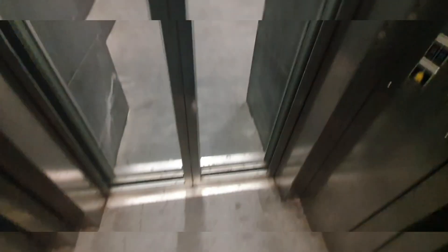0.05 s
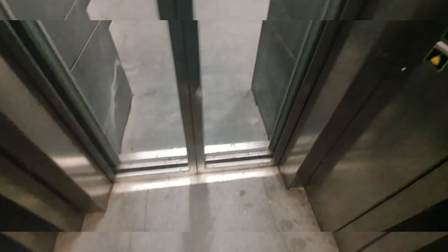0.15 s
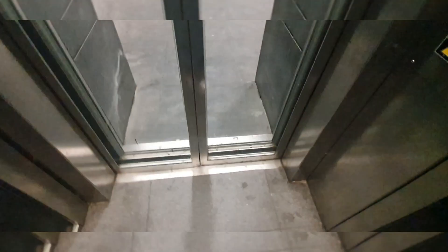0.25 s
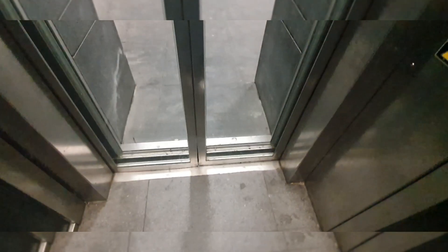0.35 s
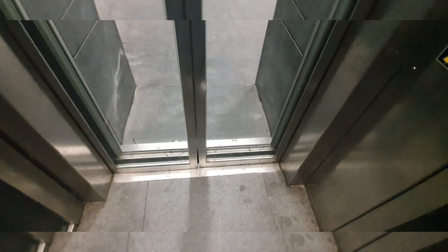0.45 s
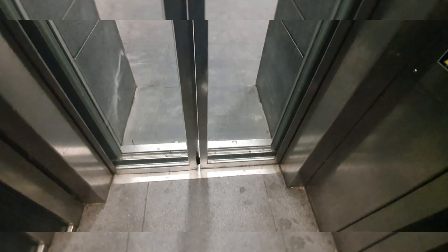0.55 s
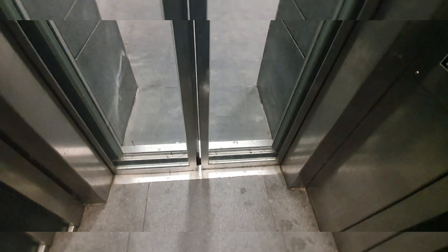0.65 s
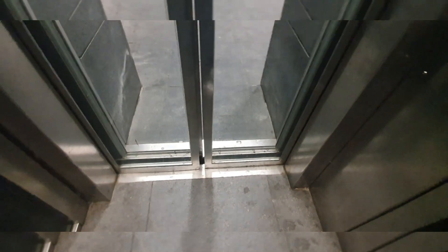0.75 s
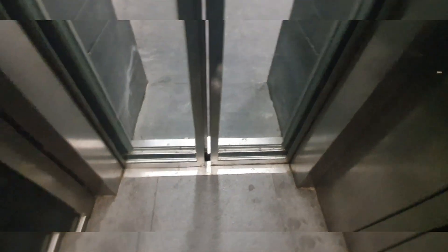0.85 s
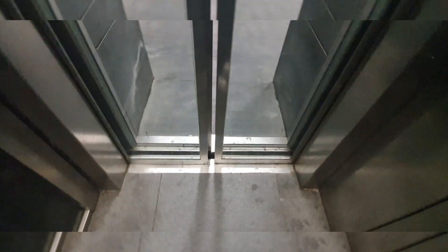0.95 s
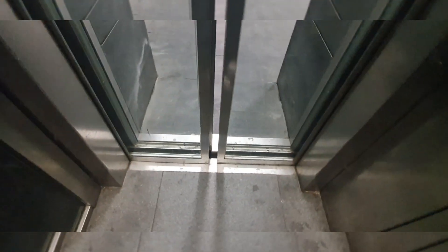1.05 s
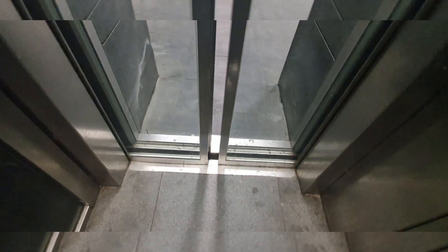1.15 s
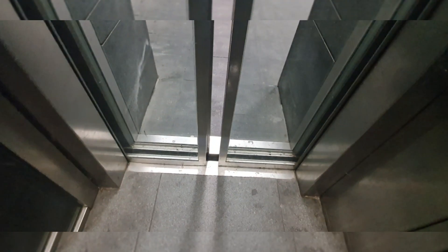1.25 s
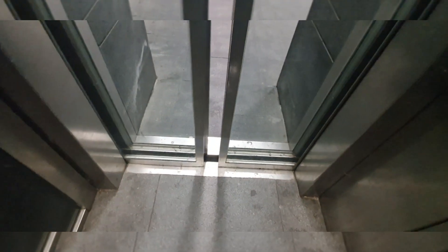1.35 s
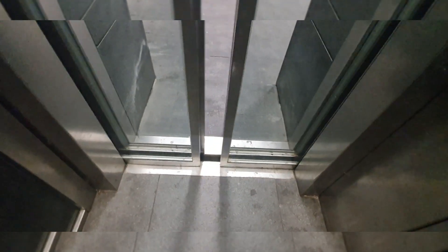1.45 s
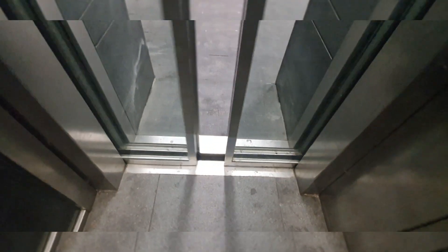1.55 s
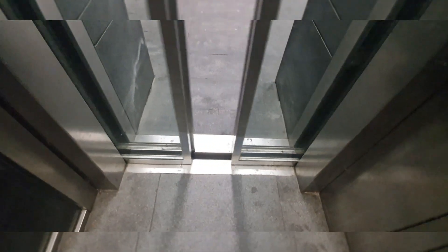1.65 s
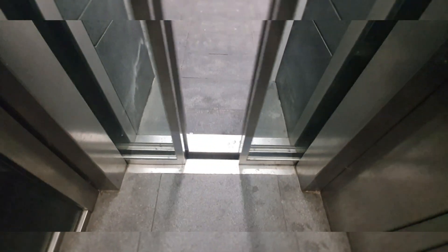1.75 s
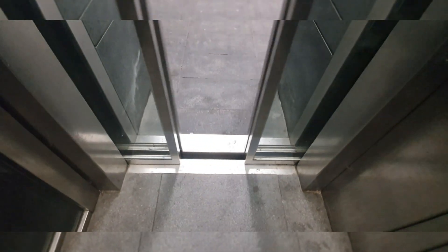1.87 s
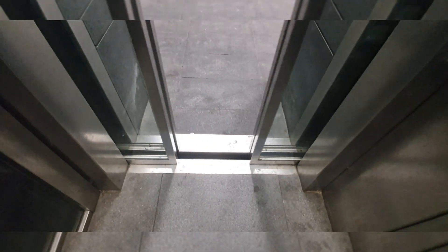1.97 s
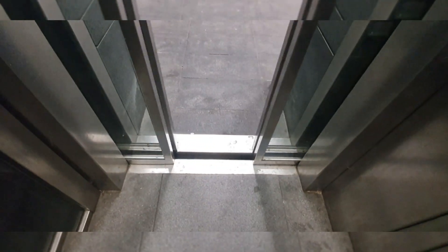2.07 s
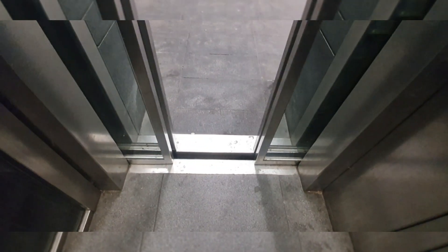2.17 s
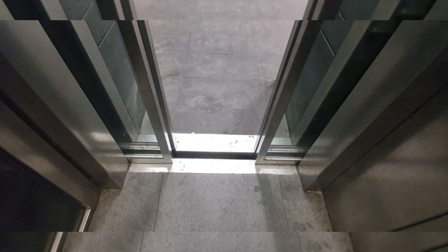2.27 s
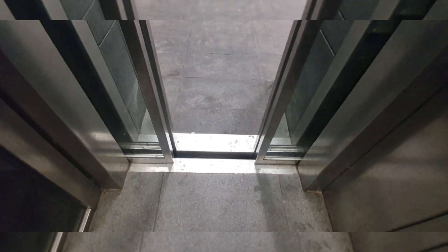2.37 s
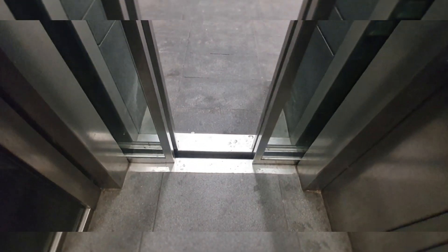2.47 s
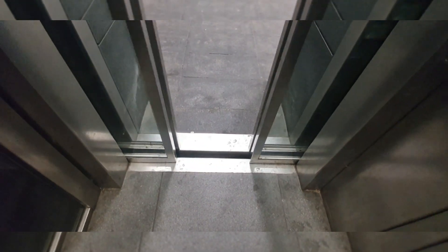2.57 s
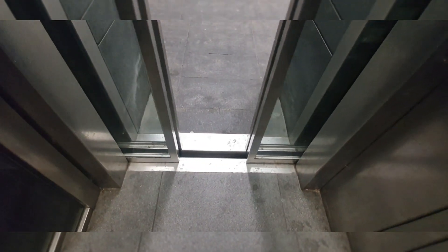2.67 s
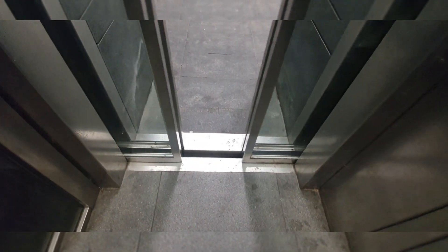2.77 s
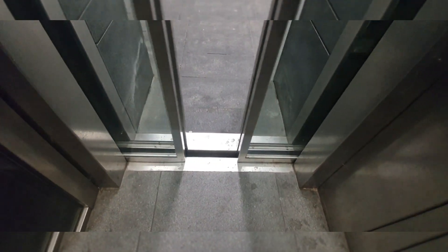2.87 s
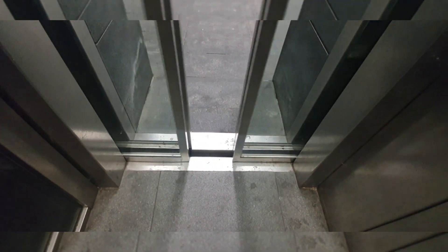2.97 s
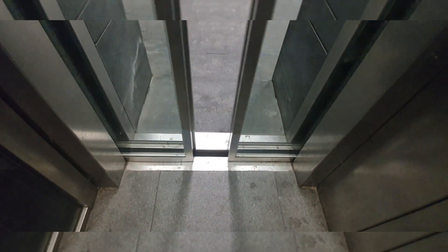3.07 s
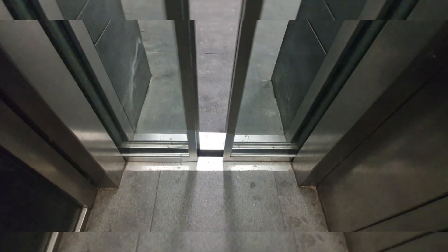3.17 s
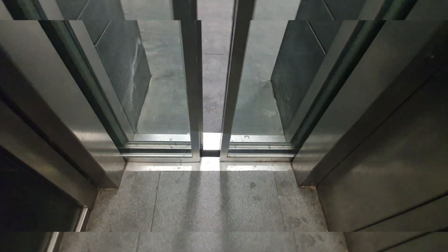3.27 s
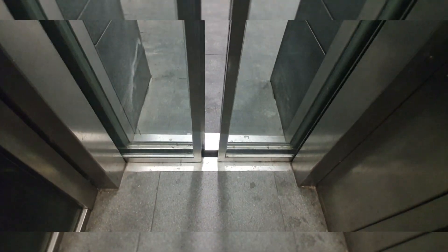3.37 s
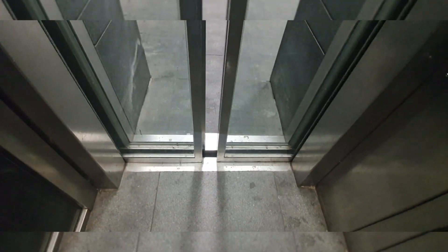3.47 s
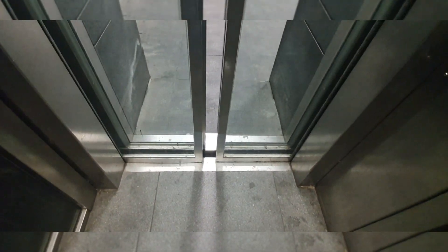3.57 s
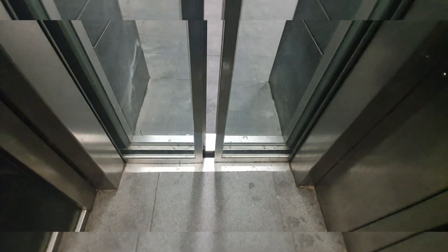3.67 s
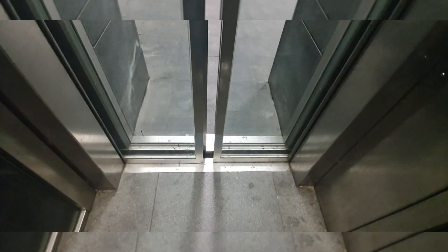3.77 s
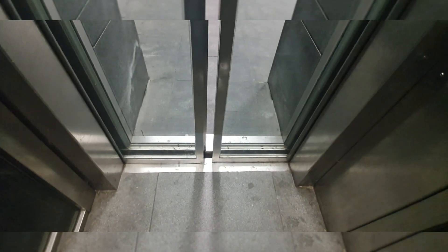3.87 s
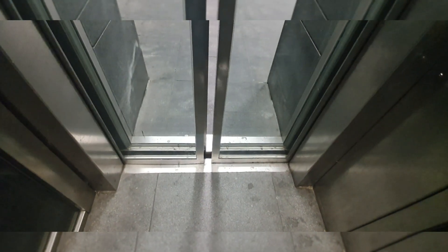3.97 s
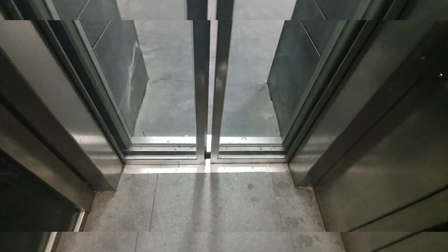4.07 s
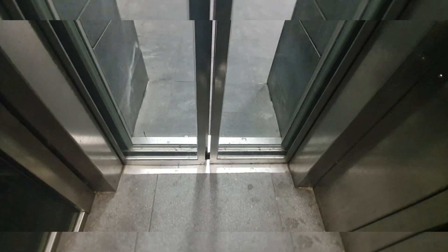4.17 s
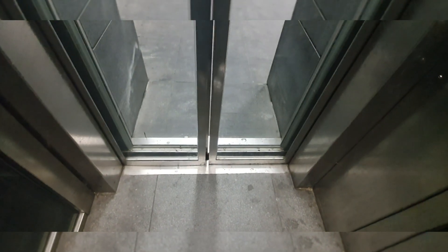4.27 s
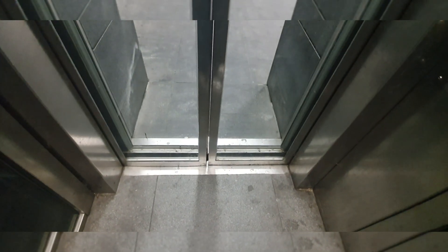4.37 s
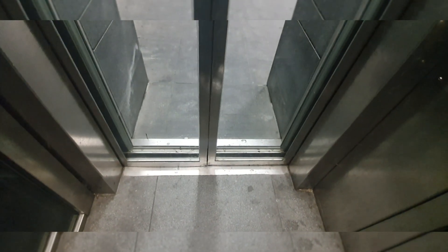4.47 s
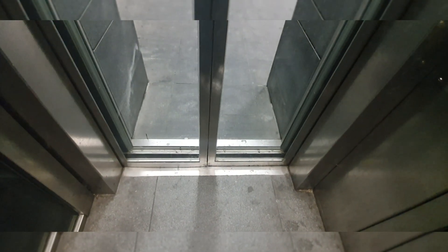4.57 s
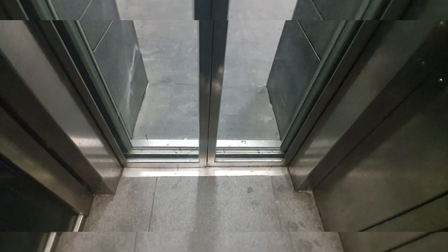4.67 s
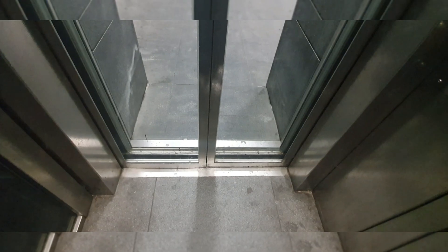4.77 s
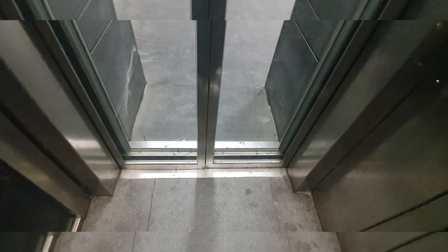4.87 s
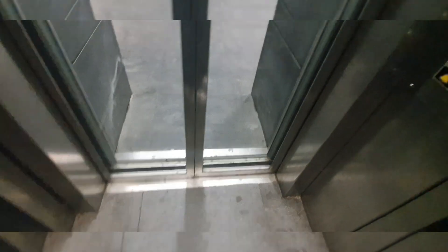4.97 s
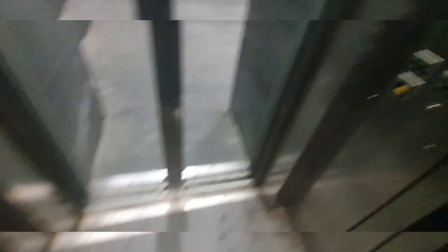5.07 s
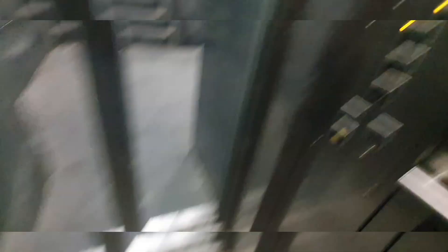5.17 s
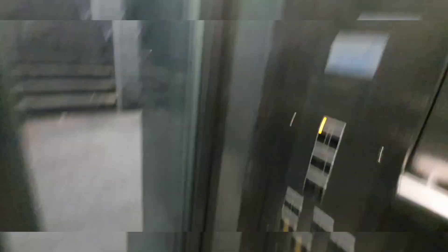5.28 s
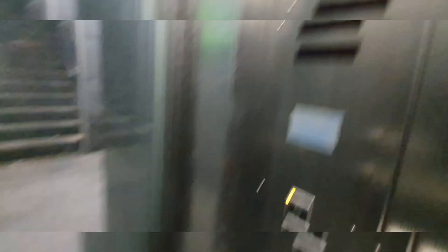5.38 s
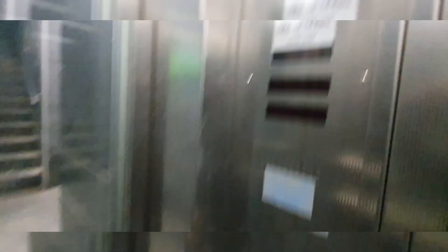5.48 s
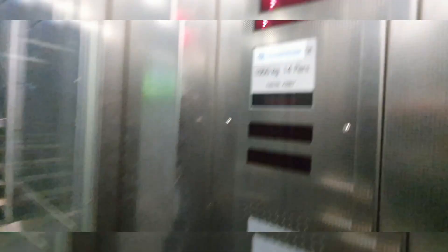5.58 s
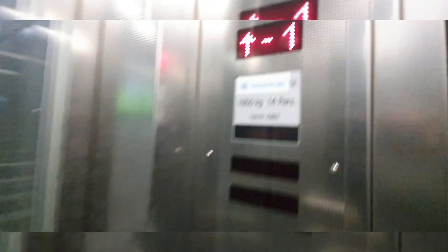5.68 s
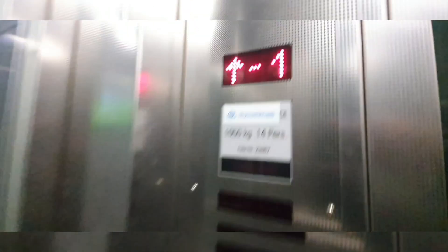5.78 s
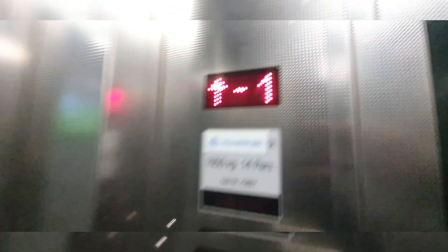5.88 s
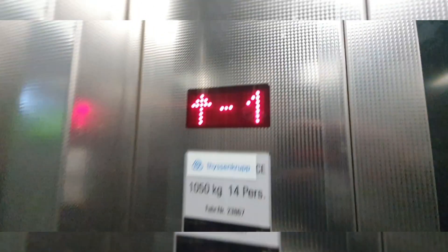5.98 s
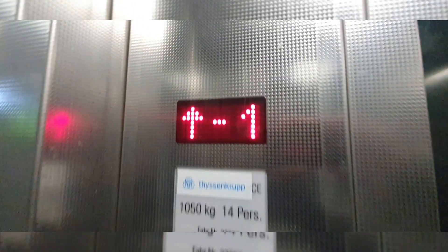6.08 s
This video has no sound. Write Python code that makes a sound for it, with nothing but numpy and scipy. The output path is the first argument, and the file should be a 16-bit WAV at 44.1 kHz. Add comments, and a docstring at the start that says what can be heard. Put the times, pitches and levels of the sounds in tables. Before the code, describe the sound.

Inside a steel lift, sliding doors clunk, rumble apart and return, meeting in a loud metallic clank with a short rubbery groan.

```python
"""A soft low jolt and a brief rustle open the ride in a steel lift car, under a faint whistle of wavering level.
Its glass doors then unlatch, roll apart, stop, roll back and meet with a clank; low throbs and rustling end it.
Rolling, jolts and knocks excite resonant panel modes; rubbing and contacts are shaped third-octave noise,
whose knocks die away in the concrete shaft. Struck steel and glass are sums of decaying sines;
the seal's groan, the hangers' squeak and the hums are gliding sines."""
import sys
import numpy as np
from scipy import signal
from scipy.io import wavfile

SR = 44100
rng = np.random.default_rng(int(sys.argv[2]) if len(sys.argv) > 2 else 0)


def log_audio(samples):
    """Write samples as a 16-bit WAV file to the path given in sys.argv[1]."""
    # one column per channel
    frames = np.atleast_2d(samples).T
    # limit to full scale, then quantise
    limited = np.clip(frames, -1, 1)
    pcm = np.round(limited * 32767).astype(np.int16)
    wavfile.write(sys.argv[1], SR, pcm)


N = 270333   # samples
LEFT_RIGHT = np.array([[1], [-1]])   # signs of the two channels
STEP = 16   # samples between envelope points


def from_db(db):
    """Logarithmic level: decibels to amplitude gain."""
    return 10 ** (np.asarray(db) / 20)


def rms_one(x):
    """Normalisation: a signal scaled to rms 1."""
    return x / np.sqrt(np.mean(x ** 2) + 1e-20)


def in_time(rows):
    """Linear interpolation: each column of a time curve, sample by sample."""
    s, *columns = np.transpose(rows)
    return [np.interp(np.arange(N) / SR, s, column) for column in columns]


def at_hz(points, hz):
    """Logarithmic pitch axis: a spectrum interpolated at a frequency."""
    table_hz, values = np.transpose(points)
    return np.interp(np.log(hz), np.log(table_hz), values)


def drift(rate_hz):
    """Low-passed noise: a slow random course of spread 1."""
    # two equal poles, run at every 40th sample; the settling part is dropped
    pole = np.exp(-80 * np.pi * rate_hz / SR)
    noise = rng.standard_normal(N // 40 + 2002)
    slow = signal.lfilter([1], [1, -2 * pole, pole * pole], noise)[2000:]
    return np.interp(np.arange(N) / 40, np.arange(len(slow)), rms_one(slow))


def ring(drive, hz, t60):
    """Two-pole resonance: a unit click sets a decaying sine of height 1 ringing."""
    radius = from_db(-60 / (t60 * SR))
    w = 2 * np.pi * hz / SR
    feedback = [1, -2 * radius * np.cos(w), radius * radius]
    return signal.lfilter([0, np.sin(w)], feedback, drive + 1e-18)


def after(s):
    """Event time base: the first sample and the time since, for up to one second."""
    i = round(s * SR)
    return i, np.arange(min(N - i, SR)) / SR


def swell(t, s, hold, rise_db_per_s, fall_db_per_s):
    """Exponential growth and decay: dB below the top of an event that rises, holds and falls."""
    return -rise_db_per_s * np.maximum(s - t, 0) - fall_db_per_s * np.maximum(t - s - hold, 0)


def add_db(a_db, b_db):
    """Incoherent addition: powers of unrelated sounds sum; b holds one row per sound."""
    return 10 * np.log10(from_db(2 * a_db) + from_db(2 * b_db).sum(axis=0))


# Likeness of the channels: (frequency [Hz], share alike [0 to 1])
LIKENESS = [(60, 1), (150, 0.87), (380, 0.83), (950, 0.026), (2400, .01), (6000, 0.45), (15000, .2)]
# Balance of the channels: (frequency [Hz], left minus right [dB])
LEAN = [(60, -1.5), (130, -2.5), (290, -3.5), (640, -2), (1410, -1.5), (3100, -4), (6820, 4),
        (15000, -21.5)]


def lean_gain(hz):
    """Interchannel level difference: the gain of each channel at a frequency."""
    return from_db(at_hz(LEAN, hz) / 2 * LEFT_RIGHT)


def stereo(mid, side, hz):
    """Interchannel coherence: two ports hear a band partly alike and lean to one side."""
    alike = np.clip(at_hz(LIKENESS, hz), 0, 1)
    both = np.sqrt((1 + alike) / 2) * mid + np.sqrt((1 - alike) / 2) * side * LEFT_RIGHT
    return both * lean_gain(hz)


# Thin whistle: (frequency [Hz], level [dB], spread of the waver [dB])
WHISTLE = (15687, -77, 5.0)


def whistle():
    """Amplitude modulation: a thin tone of steady pitch wavers in level."""
    hz, level_db, waver_db = WHISTLE
    gain = from_db(level_db + waver_db * drift(6.0))
    return np.sqrt(2) * gain * np.sin(2 * np.pi * hz * np.arange(N) / SR)


# Rollers shaking the car: (time [s], floor boom [dB], wall panels [dB])
ROLL = [(0.1, -57, -54.5), (0.3, -44, -48.5), (0.8, -33.5, -40.5), (1.0, -41.5, -49), (1.07, -68, -66),
        (1.3, -28, -34), (1.55, -33, -45), (1.75, -22.5, -33.5), (2.2, -39.5, -45.5), (2.45, -39, -53.5),
        (2.72, -40, -45.5), (2.8, -32, -43), (3.06, -27, -35), (3.34, -33.5, -39.5), (3.55, -53, -49),
        (3.8, -37, -47.5), (4.8, -43.5, -44.5), (5.27, -50.5, -57), (5.6, -37.5, -44.5), (6.1, -44, -50.5)]
# Jolts through the car: (time [s], hold [s], floor boom [dB], wall panels [dB], door frame [dB])
JOLTS = [(0.0, 0.0053, -38, -57, -46.5), (0.237, 0.018, -51, -42.5, -47.5),
         (0.354, .05, -32.5, -28.5, -32.5), (0.586, 0.067, -33, -22, -30), (0.955, 0.017, -36, -41, -48),
         (1.113, 0.043, -16.5, -20.5, -25), (1.367, 0.029, -44, -34, -59), (1.786, 0.065, -17, -29, -34),
         (1.896, 0.038, -41, -20, -28.5), (1.995, 0.089, -19.5, -34.5, -42),
         (2.126, 0.035, -45.5, -31, -36), (2.282, 0.038, -30.5, -38, -36.5),
         (2.493, 0.016, -36, -41, -46.5), (2.63, 0.015, -41.5, -40.5, -59),
         (3.614, 0.12, -36.5, -34.5, -51.5), (3.91, 0.035, -35, -57, -63), (4.01, 0.022, -25.5, -24, -29.5),
         (4.185, 0.058, -17.5, -11, -31), (4.291, 0.037, -18.5, -29, -27),
         (4.503, 0.056, -24.5, -23.5, -30.5), (5.363, 0.025, -29.5, -39.5, -70),
         (5.486, 0.031, -39, -40.5, -57)]
JOLT_RISE_DB_PER_S, JOLT_FALL_DB_PER_S = 706, 146
BOOM_LAG_S = 0.007   # the floor answers late
FRAME_DB = -5   # door frame against the wall panels while rolling


def shake():
    """Forced vibration: rolling plus jolts, in dB at envelope points, for floor, walls and frame."""
    t = np.arange(0, N, STEP) / SR
    boom, walls = np.array(in_time(ROLL))[:, ::STEP]
    s, hold, *jolt_db = np.transpose(JOLTS)[:, :, None]
    levels = []
    for roll_db, top_db, lag in zip([boom, walls, walls + FRAME_DB], jolt_db, [BOOM_LAG_S, 0, 0]):
        below_db = swell(t - lag, s, hold, JOLT_RISE_DB_PER_S, JOLT_FALL_DB_PER_S)
        levels.append(add_db(roll_db, top_db + below_db))
    return levels


# Contacts of latch, hangers and door edges, relative levels: (time [s], clack [dB], thud [dB], tick [dB],
# hiss [dB], ring time factor [1], rise time constant [s], pan, left minus right [dB])
KNOCKS = [(0.209, -41, -41.5, -72, -79, 0.55, 0.0023, -2), (0.287, -40, -57, -67, -53, 0.93, 0.0015, 3),
          (0.374, -42, -31, -53, -44, .5, 0.015, -1), (0.397, -29.5, -39, -43, -47.5, 0.79, 0.002, -1),
          (0.458, -54, -21, -47, -43.5, 0.8, 0.045, -4), (0.538, -27, -41, -37, -63, 0.65, 0.0063, 0),
          (0.552, -22.5, -23.5, -32.5, -47, 0.81, 0.0032, 0.5),
          (0.605, -26.5, -20, -30.5, -55, 0.74, 0.0039, -1), (1.027, -46, -59, -49.5, -54.5, 1, 0.0043, -1),
          (1.11, -25.5, -19, -32, -44, 0.79, 0.004, 0), (1.351, -34, -30, -40, -70, 0.55, 0.051, 9),
          (1.398, -63, -59, -40.5, -45.5, 0.73, 0.0049, -0.5),
          (1.47, -58, -37, -50, -49.5, 0.77, 0.0034, -3), (1.537, -33.5, -33, -47.5, -54, 0.67, 0.0012, -1),
          (1.625, -41, -32.5, -44.5, -43, 0.85, 0.0047, -2), (1.687, -50, -30, -85, -33, 0.41, 0.03, 3),
          (1.759, -56, -43, -82, -31.5, 0.33, 0.023, 3), (1.882, -23.5, -34, -34.5, -82, 0.85, 0.0035, 2.5),
          (2.179, -29.5, -26, -54, -48, .37, 0.016, -2), (2.265, -37.5, -35, -50.5, -52.5, 0.56, .0035, 1),
          (2.304, -47, -47, -33, -70, 0.2, 0.035, 4), (2.34, -33, -45, -65, -73, 0.39, .0021, -3),
          (2.429, -38, -35, -79, -55, 1, 0.024, -1), (2.959, -38, -55, -50, -53, 1, 0.022, 0),
          (3.18, -38, -53, -52, -62, 1, 0.004, -1), (3.51, -35, -54, -60, -74, 0.91, 0.024, -1),
          (3.622, -32, -35.5, -42, -56.5, 0.62, 0.026, 1.5),
          (3.996, -27.5, -53, -38, -42.5, .9, 0.0067, -1.5), (4.014, -23.5, -17, -31, -59, 1, 0.014, 1.5),
          (4.139, -36, -15.5, -23.5, -31, 0.55, 0.0027, 2),
          (4.211, -15.5, -22.5, -22, -36.5, 0.68, 0.0019, 0), (4.245, -54, -22, -50, -35, 0.48, 0.005, -2),
          (4.475, -27.5, -29, -46, -44, 0.59, 0.005, -5), (4.485, -29.5, -25, -43, -51.5, 0.74, .0022, 6),
          (5.017, -42, -59, -45.5, -52, 1, 0.017, 0.5)]
HARD_S = 0.012   # contacts that rise faster than this crack and strike the modes


def hard_knocks():
    """Impact duration: only contacts that rise fast strike the modes."""
    return np.array([row for row in KNOCKS if row[6] < HARD_S])


# Deep sway of the car: (time [s], level [dB])
SWAY = [(0.0, -53.5), (0.77, -35), (0.8, -51), (1.26, -38.5), (2.82, -41.5), (3.86, -41.5), (4.08, -47.5),
        (4.66, -36.5), (5.21, -58.5), (5.36, -47), (5.91, -61), (6.13, -48)]
# Panel modes of the car: (frequency [Hz], relative level [dB], decay time t60 [s])
CAR = [(73.5, -4, 0.88), (86, 2.5, 0.48), (96.3, -10, 0.68), (164.2, -4.5, 0.58), (182.4, -2.5, 0.55),
       (231.7, -7, 0.64), (305, -8, 0.69), (330.1, -2, 0.24), (351.2, -5, 0.3), (402.8, -12.5, 0.73),
       (465, -10.5, 0.45), (529.7, -18.5, 0.32)]
THUD_DB = -12.5   # a contact's thud as a blow to the modes
PUSH_DB, PUSH_LAG_S = -7, 0.01212   # each jolt also strikes the panel modes once


def car():
    """Modal resonance: rolling, jolts and thuds drive each panel mode; the deep sway is band noise."""
    out, knocks, jolts = 0, hard_knocks(), np.array(JOLTS)
    struck = (knocks[:, 0] * SR).astype(int)
    pushed = ((jolts[:, 0] + PUSH_LAG_S) * SR).astype(int)
    shaking = np.repeat(from_db(shake()), STEP, axis=1)[:, :N]
    for hz, level_db, t60 in CAR:
        group = np.searchsorted([125, 270], hz)   # floor, walls or frame
        # long ringing stores more noise, so its drive is reduced
        noise_gain = from_db(-7.5) * np.sqrt(4 * np.log(1000) / (t60 * SR))
        drive = rng.standard_normal((2, N)) * shaking[group] * noise_gain
        chance_db = 4.0 * rng.standard_normal(len(struck))
        drive[0, struck] += from_db(knocks[:, 2] + THUD_DB + chance_db)
        drive[0, pushed] += from_db(jolts[:, 2 + group] + PUSH_DB) * rng.choice([-1, 1])
        mid, side = from_db(level_db) * ring(drive, hz, t60)
        out = out + stereo(mid, side, hz)
    sway_band = signal.butter(2, [34, 56], "band", fs=SR, output="sos")
    sway = rms_one(signal.sosfilt(sway_band, rng.standard_normal((2, N))))
    mid, side = from_db(in_time(SWAY)[0]) * sway
    return out + stereo(mid, side, 40)


# Guide shoes rubbing in the sill track, with a burst of noise from the clank at 4.17 s:
# (time [s], scrape [dB], hiss [dB])
RUB = [(0.2, -60, -96), (0.38, -57, -99), (0.44, -41.5, -68), (0.6, -52, -67.5), (0.87, -47, -69.5),
       (1.11, -59.5, -86), (1.3, -49, -82), (1.45, -50, -74), (1.83, -46, -62.5), (2.06, -55.5, -67),
       (2.32, -55, -72), (3.14, -54.5, -72.5), (3.52, -75, -85), (4.05, -66.5, -76), (4.17, -36, -45),
       (4.3, -44, -58), (4.58, -53, -71.5), (4.85, -63.5, -87), (5.04, -65, -70.5), (5.2, -62.5, -75.5)]
GRIT_SHARE, GRIT_DB = 0.54, -3.5   # grit lies between scrape and hiss
# Air, the top of the spectrum, for rubbing and contacts alike: (time [s], level against the hiss [dB])
AIR = [(0.2, -33), (0.5, 1), (0.62, -10), (0.9, -4.5), (1.5, -3), (1.7, 2), (2.1, 5), (2.5, -7.5),
       (3.3, -6), (3.7, -1.5), (4.15, -5.5), (4.25, 0.5), (4.5, -2), (4.9, -3.5)]
# Rustling close by, brief at the start, then longer from clothing at the end: (time [s], hold [s], level [dB])
RUSTLES = [(0.0, 0.0092, -49.5), (5.423, 0.54, -51.5)]
RUSTLE_RISE_DB_PER_S, RUSTLE_FALL_DB_PER_S = 60, 59.5
# Colour of the rustles, one value each for scrape, grit, hiss and air: (relative level [dB])
RUSTLE_COLOUR_DB = [1.5, -5, -14.5, -15]


def rubbing():
    """Broadband noise: scrape, grit, hiss and air of rubbing, clank burst and rustles, in dB at envelope points."""
    t = np.arange(0, N, STEP) / SR
    scrape, hiss = np.array(in_time(RUB))[:, ::STEP]
    grit = hiss + GRIT_SHARE * (scrape - hiss) + GRIT_DB
    air = hiss + in_time(AIR)[0][::STEP]
    s, hold, level_db = np.transpose(RUSTLES)[:, :, None]
    rustle_db = level_db + swell(t, s, hold, RUSTLE_RISE_DB_PER_S, RUSTLE_FALL_DB_PER_S)
    parts = [scrape, grit, hiss, air]
    return [add_db(part_db, rustle_db + colour_db) for part_db, colour_db in zip(parts, RUSTLE_COLOUR_DB)]


# Decay in the shaft, before each contact's ring time factor: (frequency [Hz], decay time t60 [s])
SHAFT = [(600, 0.86), (1580, 0.79), (4180, 0.56), (11000, 0.48)]
CRACK_DB, CRACK_T60_S = -3, 0.033
TAIL_DB, SHORTEST_RISE_S = -9.5, 0.0003


def contact_power(contact, weight, chance_db, hz):
    """Reverberant decay: one contact's power in one band, a crack and a tail dying in the shaft."""
    s, clack_db, thud_db, tick_db, hiss_db, long, rise_s, pan_db = contact
    t = np.arange(SR // 16) * STEP / SR
    air_db = hiss_db + np.interp(s, *np.transpose(AIR))
    level_db = weight @ [thud_db - 3.0, clack_db, tick_db, hiss_db, air_db] + chance_db
    tail_t60 = max(long, 0.02) * at_hz(SHAFT, hz)
    tail = from_db(2 * (TAIL_DB - 60 * t / tail_t60))
    crack = from_db(2 * (CRACK_DB - 60 * t / CRACK_T60_S)) * (rise_s < HARD_S)   # only hard contacts crack
    onset = 1 - np.exp(-t / max(rise_s, SHORTEST_RISE_S))
    return from_db(2 * level_db + pan_db * LEFT_RIGHT) * (tail * onset ** 2 + crack * onset)


# Colour of the car: (frequency [Hz], relative level [dB])
COLOUR = [(600, 0.5), (1000, -6), (1600, -2.5), (2400, -2), (3500, 3), (5000, 3), (6500, 4.5), (9000, 2.5),
          (12000, -1.5), (15500, -3.5)]


def doors(patchy_db, between_db, rattle_db):
    """Subtractive synthesis: third-octave noise follows the rubbing and every contact, band by band."""
    out, edges = 0, 120 * 2 ** (np.arange(22) / 3)
    white = rng.standard_normal((2, 2, N))   # neighbouring bands take turns
    centres = np.log([300, 1200, 3600, 6200, 10500])   # Hz: frame or thud, scrape or clack, grit or tick, hiss, air
    rub_db = np.array([shake()[2] + between_db, *rubbing()])
    rattle = from_db(2 * rattle_db * drift(60.0)[::STEP])   # contacts chatter in all bands at once
    scatter = rng.standard_normal((len(KNOCKS), 21))   # no two contacts have quite the same colour
    for k, (low, high) in enumerate(zip(edges, edges[1:])):
        high = 16200 if k == 20 else high
        hz = np.sqrt(low * high)
        place = np.interp(np.log(hz), centres, range(5))
        weight = np.maximum(1 - abs(place - np.arange(5)) * 1.127, 0)
        weight /= weight.sum()
        band_db = weight @ rub_db + patchy_db * drift(5.7)[::STEP]
        power = np.tile(from_db(2 * band_db), (2, 1))
        for contact, chance in zip(KNOCKS, scatter):
            i = int(contact[0] * SR) // STEP
            burst = contact_power(contact, weight, 2 * chance[k], hz)
            span = power[:, i:i + burst.shape[1]]
            length = span.shape[1]
            span += burst[:, :length] * rattle[i:i + length]
        gain = np.repeat(np.sqrt(power), STEP, axis=1)[:, :N]
        band = signal.butter(2, [low, high], "band", fs=SR, output="sos")
        mid, side = rms_one(signal.sosfilt(band, white[k % 2]))
        out = out + from_db(at_hz(COLOUR, hz) - 7.0) * gain * stereo(mid, side, hz)
    return out


# Door panel modes rung by every hard knock: (frequency [Hz], relative level [dB], decay time t60 [s])
DOOR = [(634, -14, 1), (775, -9, 0.72), (873, 1.5, 0.34), (1050, -6, 0.23), (1255, -1, 0.2),
        (1493, -13, 0.19), (1664, -10.5, 0.497), (1855, -9, 0.31), (2180, -2.5, 0.22), (2690, -4.5, .25),
        (2766, -3.5, 0.31), (3360, -6.5, .2)]


def panels(level_db):
    """Modal excitation: a hard knock strikes each door mode with its own strength and sign at each port."""
    out, knocks = np.zeros((2, N)), hard_knocks()
    at = (knocks[:, 0] * SR).astype(int) + 90   # about 2 ms late
    for hz, mode_db, t60 in DOOR:
        blow_db = knocks[:, 1 if hz < 2000 else 3]   # clack below, tick above
        clicks = np.zeros((2, N))
        clicks[:, at] = from_db(blow_db + level_db + mode_db) * rng.standard_normal((len(at), 2)).T
        out += ring(clicks, hz, t60)
    return out


CHATTER_DB, CHATTER_HZ = 3.0, 50   # struck steel sits loose and each high mode flutters on its own


def struck_modes(blows, modes, crowds):
    """Modal superposition: a blow rings clear modes as sines and crowded modes as dying narrow noise."""
    out, flutter = np.zeros((2, N)), from_db(CHATTER_DB * drift(CHATTER_HZ))
    for s, blow_db, tilt_db in blows:
        i, t = after(s)
        for hz, level_db, t60 in modes:
            is_high = hz > 600
            phase = rng.uniform(0, 2 * np.pi, (2, 1)) * is_high   # long waves arrive alike
            # high modes have a weaker twin close by that beats with them
            twin_hz = hz * (1 + 0.008 * rng.uniform(-1, 1, (2, 1)))
            twin = 0.55 * is_high * np.sin(2 * np.pi * twin_hz * t - phase)
            wave = np.sin(2 * np.pi * hz * t + phase) + twin
            if is_high:
                wave = wave * [flutter[k:k + SR] for k in rng.integers(0, N - SR, size=2)]
            size_db = blow_db + level_db + tilt_db * np.log2(hz / 6000) - 60 * t / t60
            onset = 1 - np.exp(-t / 0.00094)
            out[:, i:i + SR] += from_db(size_db) * onset * wave * lean_gain(hz)
        for hz, width, level_db, t60 in crowds:
            band = signal.butter(2, [hz - width / 2, hz + width / 2], "band", fs=SR, output="sos")
            noise = rms_one(signal.sosfilt(band, rng.standard_normal((2, SR))))
            out[:, i:i + SR] += noise * from_db(blow_db + level_db - 60 * t / t60)
    return out


# Coupler catching the landing doors: (time [s], level [dB], tilt [dB per octave])
CATCH = [(1.111, -38.5, 0.3)]
# Clear modes of the coupler: (frequency [Hz], relative level [dB], decay time t60 [s])
COUPLER = [(1510, 4.5, .15), (3050, -4, 0.29), (3240, -12, 0.79), (4040, -9, 0.42), (3990, -7, 0.96),
           (4020, -6, 0.65), (4140, -7, 0.6), (4270, 1, 0.31), (4650, -2.5, 0.23), (5230, -10.5, 0.44),
           (5120, -13, .28), (5370, -13, .3)]
# Crowded modes of the coupler: (frequency [Hz], width [Hz], relative level [dB], decay time t60 [s])
COUPLER_CROWD = [(3220, 610, -0.92, 0.73), (4170, 830, 0.72, 0.68)]


def coupler():
    """Impact response: the steel coupler rings as it catches the landing doors."""
    return struck_modes(CATCH, COUPLER, COUPLER_CROWD)


def friction_tone(rows, rough_db, rise_db_per_s, fall_db_per_s):
    """Stick-slip oscillation: tones glide while they hold and shiver in level."""
    out, shiver_db = np.zeros(N), rough_db * drift(17.0)
    lead = 0.25   # s for the rise before the hold
    for s, hold, first_hz, last_hz, level_db in rows:
        i, t = after(s - lead)
        t = t - lead
        hz = np.interp(t, [0, hold], [first_hz, last_hz])
        db = level_db + swell(t, 0, hold, rise_db_per_s, fall_db_per_s) + shiver_db[i:i + SR]
        out[i:i + SR] += np.sqrt(2) * from_db(db) * np.sin(2 * np.pi * np.cumsum(hz) / SR)
    return out


# Hanger squeak and its faint upper partner: (time [s], hold [s], first pitch [Hz], last pitch [Hz], level [dB])
SQUEAK = [(1.5, .22, 1556, 1548, -59), (1.78, .04, 1550, 1546, -60), (1.51, .1, 4190, 4205, -69),
          (1.66, .11, 4175, 4190, -68)]


def squeak():
    """Stick-slip: the hangers squeak thinly."""
    return friction_tone(SQUEAK, rough_db=4.0, rise_db_per_s=190, fall_db_per_s=250)


# Frame humming as the doors brake: (time [s], hold [s], first pitch [Hz], last pitch [Hz], relative level [dB])
STOP_HUM = [(1.92, 0.12, 331.8, 324, -31.5), (2.09, .02, 325, 329.6, -37.5)]


def stop_hum():
    """Stick-slip under braking: the frame hums, slightly stronger on the right."""
    hum = friction_tone(STOP_HUM, rough_db=0.7, rise_db_per_s=600, fall_db_per_s=400)
    return hum * from_db([[-1.3], [1.3]])


# Groan of the rubber seal: (time [s], hold [s], first pitch [Hz], last pitch [Hz], level [dB])
GROAN = [(4.015, .16, 659.5, 622.4, -37.5)]


def groan():
    """Stick-slip of rubber: the seal groans with a falling pitch."""
    return friction_tone(GROAN, rough_db=2.5, rise_db_per_s=1500, fall_db_per_s=480)


# Steel lock hook dropping in and bouncing: (time [s], level [dB], tilt [dB per octave])
CLANKS = [(4.1405, -23.5, 3.5), (4.2445, -55, 20)]
# Pitches of the hook's clear modes: (frequency [Hz])
HOOK_HZ = [4960, 5752, 5992, 6069, 6474, 6583, 6784, 6931, 7086, 7275, 7745, 8640, 10610, 11550, 12110,
           13240, 14850]
# Ringing of the same modes in the same order: (relative level [dB], decay time t60 [s])
HOOK_RING = [(-9.5, 0.53), (-2, 0.34), (-4, .22), (-15, .25), (-4, 0.23), (-14.5, 0.39), (-9, .15),
             (-18.5, 0.17), (-4.5, 0.18), (0, .2), (-8, 0.29), (-29.5, 0.24), (-24.5, .2), (-25, 0.154),
             (-24, .12), (-20, .1), (-23, 0.14)]
# Dense close modes of the hook: (frequency [Hz], width [Hz], relative level [dB], decay time t60 [s])
HOOK_CROWD = [(6760, 940, -5.5, 0.4)]


def lock_hook():
    """Impact response: the steel hook clanks as it drops in and bounces."""
    modes = [(hz, *ringing) for hz, ringing in zip(HOOK_HZ, HOOK_RING)]
    return struck_modes(CLANKS, modes, HOOK_CROWD)


# Doors meeting: (time [s], relative level [dB], tilt [dB per octave])
MEET = [(4.215, -25, 0.01)]
# Long modes of the glass: (frequency [Hz], relative level [dB], decay time t60 [s])
GLASS = [(154, 3, 0.96), (232.1, 2, 1.7), (300, -9.5, 1.17)]


def glass():
    """Plate resonance: the meeting doors set the long low modes of the glass ringing."""
    return struck_modes(MEET, GLASS, []).mean(axis=0) * from_db([[-1.3], [1.3]])


# Low throbs as the car moves off: (time [s], hold [s], first pitch [Hz], last pitch [Hz], relative level [dB])
DRIVE_HUM = [(5.35, 0.012, 81.4, 80, -43.5), (5.54, 0.038, 90.4, 89, -33), (5.66, 0.03, 89.4, 94.5, -31),
             (5.77, 0.012, 86, 81.2, -39)]


def drive_hum():
    """Gliding oscillation: short low throbs as the car moves off, slightly stronger on the right."""
    hum = friction_tone(DRIVE_HUM, rough_db=4.5, rise_db_per_s=440, fall_db_per_s=750)
    return hum * from_db([[-1.3], [1.3]])


# Soft bump near the right port: (time [s], frequency [Hz], peak level [dB], decay time t60 of each resonance [s])
BUMP = (5.381, 175, -22, .04)


def bump():
    """Cascaded resonance: two in a row soften a padded touch, heard mostly on the right."""
    s, hz, level_db, t60 = BUMP
    click = 1. * (np.arange(N) == round(s * SR))
    thud = ring(ring(click, hz, t60), hz, t60)
    return thud / abs(thud).max() * from_db(level_db) * from_db([[-15], [0]])


# Dry ticks close to the microphone: (time [s], relative level [dB], frequency [Hz], pan, left minus right [dB])
TICKS = [(5.495, -42.5, 1830, -22), (5.693, -40.5, 630, 8), (5.799, -47, 676, -5), (6.101, -40, 670, -5)]


def ticks():
    """Heavy damping: short sines die within a few cycles."""
    out = np.zeros((2, N))
    for s, level_db, hz, pan_db in TICKS:
        i, t = after(s)
        shape = np.exp(-t * hz / 1.9) * (1 - np.exp(-t * hz * 2))
        click = np.sin(2 * np.pi * hz * t) * shape
        out[:, i:i + SR] += click * from_db(level_db + 5 + pan_db / 2 * LEFT_RIGHT)
    return out


def scene():
    """Superposition: all sources add as they reach the two ports."""
    moving = car() + doors(patchy_db=2.0, between_db=-8.5, rattle_db=1.5)
    struck = panels(level_db=-14.5) + coupler() + lock_hook() + glass()
    tones = whistle() + squeak() + stop_hum() + groan() + drive_hum()
    near = bump() + ticks()
    return moving + struck + tones + near


# Resonances and notches of the microphone ports: (frequency [Hz], width [Hz], gain [dB])
PORTS = [(6480, 1670, 8), (7560, 980, -10.5), (9200, 2060, 6.5), (13300, 4700, -1)]
CUTOFF_HZ = 15760


def record(dry):
    """Linear filtering: the ports lift and notch the treble, then a steep low-pass cuts the top."""
    for hz, width, level_db in PORTS:
        w, a, g = 2 * np.pi * hz / SR, np.tan(np.pi * width / SR), from_db(level_db / 2)
        forward = [1 + a * g, -2 * np.cos(w), 1 - a * g]
        feedback = [1 + a / g, -2 * np.cos(w), 1 - a / g]
        dry = signal.lfilter(forward, feedback, dry)
    return signal.sosfilt(signal.ellip(12, 0.5, 70, CUTOFF_HZ, fs=SR, output="sos"), dry)


dry = scene()
out = record(dry)
log_audio(out)
```